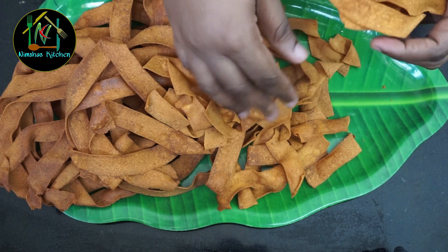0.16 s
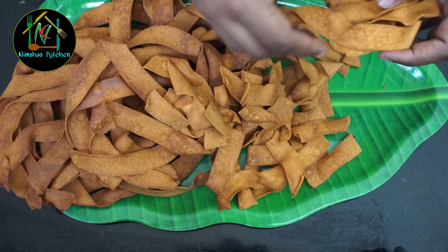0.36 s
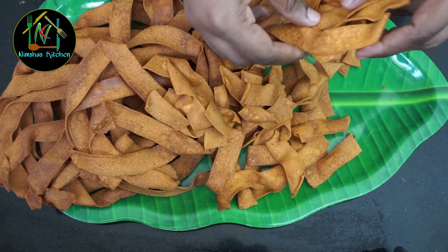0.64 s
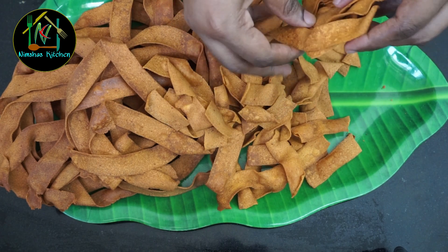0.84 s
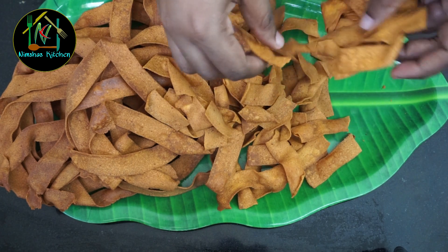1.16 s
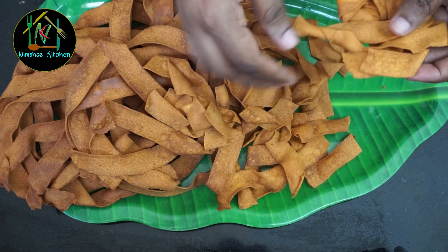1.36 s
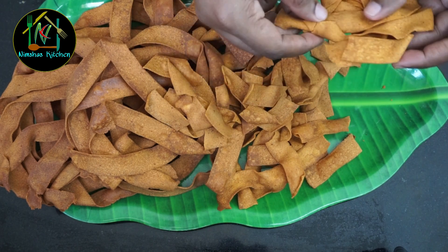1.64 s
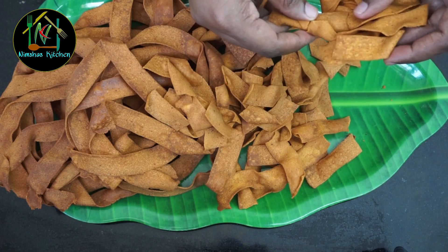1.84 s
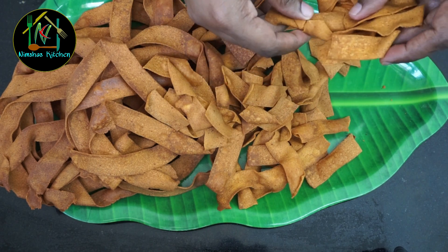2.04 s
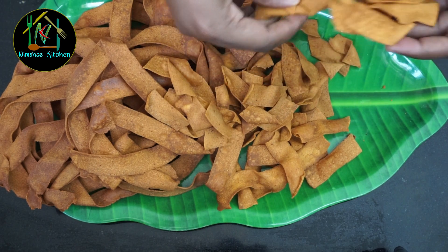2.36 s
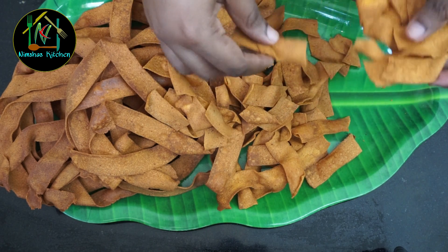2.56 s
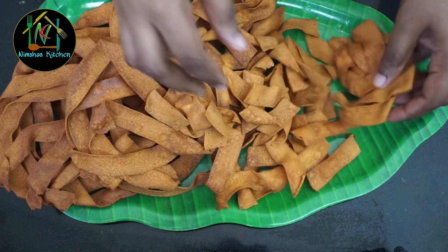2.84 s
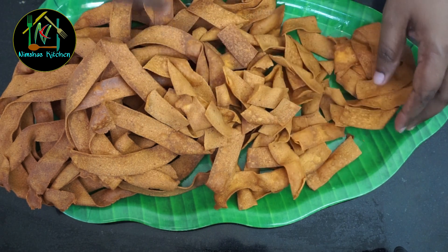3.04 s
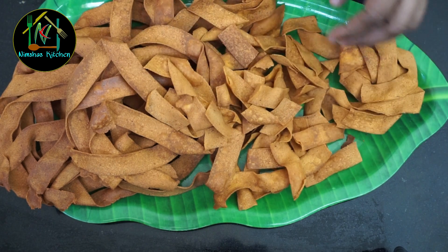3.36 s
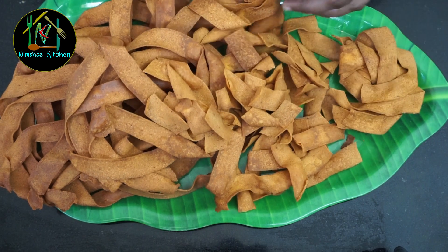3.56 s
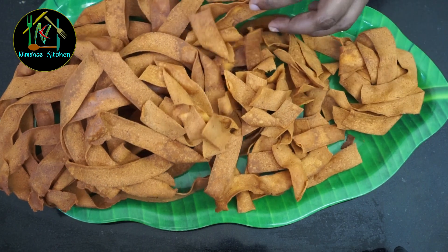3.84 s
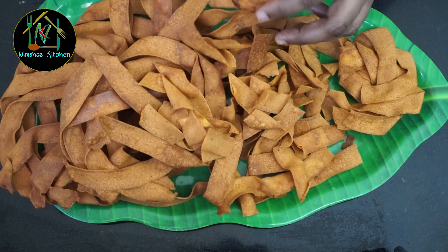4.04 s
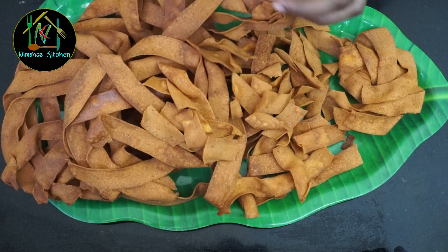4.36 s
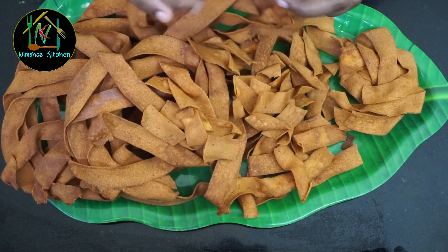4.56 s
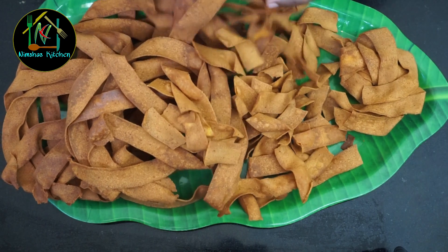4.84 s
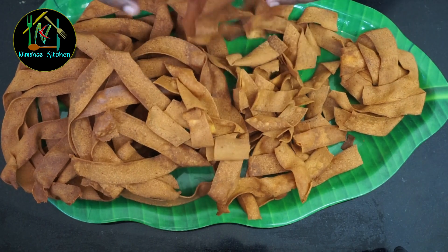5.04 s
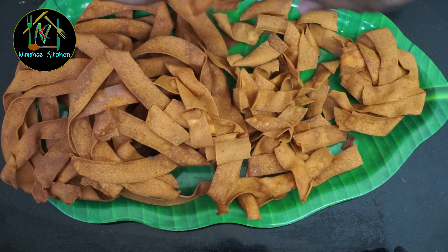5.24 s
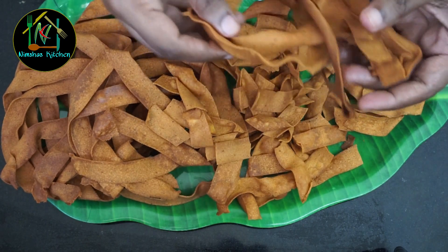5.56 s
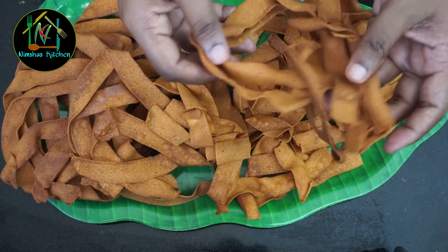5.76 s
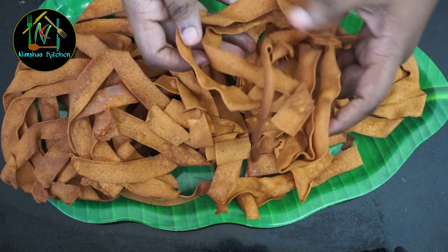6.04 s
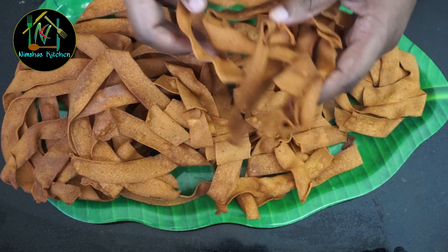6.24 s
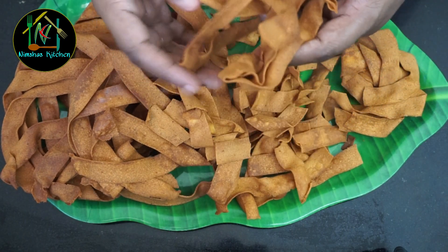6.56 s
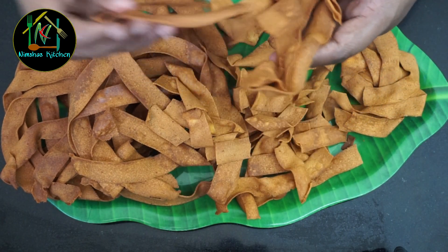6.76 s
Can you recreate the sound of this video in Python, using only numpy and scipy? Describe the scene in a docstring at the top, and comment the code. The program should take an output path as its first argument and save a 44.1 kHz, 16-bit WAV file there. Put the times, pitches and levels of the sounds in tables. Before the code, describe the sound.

Hands break crisp deep-fried strips with sharp, bright snaps over a plate, then rustle and scrape through the brittle heap in a kitchen.

```python
"""Over a faint drone that swells and fades, hands shuffle lightly and snap crisp fried strips over a plate.
Each snap is a run of tiny fractures that rings the fragment; dropped pieces ring their own modes and the plate's.
Then the hands dig into the heap, a swarm of scrapes and light knocks with crumbs clicking off the crust.
Last they lift it: the plate's ring fades from the swarm and a soft rumble swells.
A hard-walled kitchen answers with near echoes and a diffuse tail."""
import sys
import numpy as np
from scipy import signal
from scipy.fft import rfft, irfft, next_fast_len
from scipy.io import wavfile
from scipy.ndimage import uniform_filter1d

SR = 44100
rng = np.random.default_rng(int(sys.argv[2]) if len(sys.argv) > 2 else 0)


def transcribe(signal):
    """Save signal, clipped to [-1, 1], as a 16-bit WAV file at the path in sys.argv[1]."""
    frames = np.atleast_2d(signal).T
    limited = np.clip(frames, -1, 1)
    pcm = np.round(limited * 32767).astype(np.int16)
    wavfile.write(sys.argv[1], SR, pcm)


N = 304107

# All source levels are those before the room.
# Strips snapping and crunching. Each row: start in seconds, crack level in dB, fragment pitch in Hz,
# knock level in dB, crack decay in seconds.
STRIP_SNAPS = [(.221, -40, 6440, -42.5, 0.0025), (0.2375, -35, 5400, -57, 0.0035),
               (.6215, -55.5, 8000, -71, 0.0033), (0.8517, -48.5, 9000, -87, 0.0058),
               (0.977, -33.5, 9100, -61, 0.0015), (0.9793, -28.5, 9600, -46, 0.0016),
               (1.122, -44.5, 8160, -60, 0.002), (1.262, -46, 6300, -64, 0.001),
               (1.33, -36, 7300, -45, 0.0019), (1.49, -47, 5630, -43.5, 0.0028),
               (1.5398, -44.5, 6300, -36.5, 0.00093), (1.7564, -52, 6900, -57, 0.0021),
               (1.888, -27, 5870, -43.5, 0.0016), (2.1211, -36, 5560, -52.5, 0.0018),
               (2.13, -27.5, 7340, -46, 0.001), (2.2846, -45.5, 9400, -54.5, 0.0019),
               (2.3505, -31.5, 8700, -49, 0.0038), (2.7703, -35, 5050, -43, 0.0024),
               (2.889, -28.5, 5700, -33, 0.0016), (2.8962, -33, 6840, -34, 0.0042),
               (2.9, -25.5, 7500, -20.5, 0.0029), (3.069, -39.5, 3460, -36.5, 0.003),
               (3.6206, -43, 7500, -31, .004), (3.6631, -28.5, 8560, -32.5, 0.0076),
               (3.8752, -42, 7600, -47, 0.0091), (3.9082, -46, 5000, -52, 0.0028),
               (4.0607, -31, 6950, -37, 0.0093), (4.2206, -35, 6130, -37, 0.0057),
               (4.324, -40, 5770, -55, 0.0021), (4.5413, -42, 7040, -46, 0.0016),
               (4.6441, -41, 7940, -44, 0.0037), (4.723, -41, 7400, -41, .003),
               (4.8562, -40, 6950, -44, 0.0031), (4.873, -32.5, 8600, -47, 0.0067),
               (5.1094, -27.5, 8000, -29, 0.0055), (5.22, -36.5, 4270, -55, 0.0019),
               (5.1795, -29, 6430, -32.5, 0.0049), (5.301, -41.5, 6800, -61, 0.0077),
               (5.453, -34.5, 7300, -50, 0.0076), (5.5731, -24, 6400, -33, 0.006),
               (5.76, -39, 7000, -43, 0.0068), (5.7977, -34.5, 5500, -36.5, 0.006),
               (5.9957, -38.5, 4640, -51, 0.0028), (6.026, -35.5, 4650, -37, 0.0043),
               (6.0932, -29, 6160, -34.5, 0.0052), (6.1726, -35, 4400, -41, 0.0056),
               (6.647, -47, 8000, -54, 0.0045), (6.7368, -35.5, 7400, -52, 0.011),
               (6.784, -32.5, 6750, -56, 0.0085), (6.861, -40, 5700, -51, 0.0043)]
# Pieces landing on the heap. Each row: start in seconds, level in dB, pitch in Hz, settling time in seconds,
# plate ring against the piece in dB.
PIECE_DROPS = [(.245, -45.5, 1020, 0.013, -9), (1.336, -42.5, 1600, .028, -22),
               (1.54, -35, 1650, 0.0034, -15), (2.903, -32.5, 1740, .012, -1),
               (2.927, -22.5, 1860, .012, -12), (2.961, -25, 1860, .012, -12),
               (3.083, -31, 1720, .006, -8.5), (3.2058, -32, 1970, .007, -10.5),
               (3.319, -40, 2900, 0.0036, -14), (3.433, -43, 2100, 0.0056, -18),
               (3.975, -36.5, 1980, 0.0085, -6), (4.268, -35.5, 1600, .004, -2),
               (4.416, -34.5, 1620, 0.0087, 0), (4.535, -29.5, 1100, .006, -1),
               (4.775, -38, 1600, .003, -12), (5.026, -23.5, 956, .012, -8.5),
               (5.1368, -26, 4530, 0.000955, -18), (5.149, -27, 2140, .008, -26),
               (5.217, -37.5, 1600, .003, 4), (5.451, -34.5, 1550, 0.0031, -20),
               (5.812, -37.5, 2960, 0.0058, -13), (5.915, -39, 2620, .005, -20),
               (5.952, -35.5, 1840, .004, -11), (6.063, -35, 2550, .006, -23),
               (6.461, -51.5, 2770, .004, -25), (6.765, -32, 2340, 0.0019, -12),
               (6.812, -46, 2680, 0.0028, -18)]
# Hands pushing strips against each other. Each row: start in seconds, length in seconds, knocking in dB,
# scraping in dB, pitch of the gripped strip in Hz.
HAND_PUSHES = [(0, 0.031, -82, -55, 7000), (0.216, 0.042, -45.5, -46, 3360), (0.82, 0.027, -72, -63, 8000),
               (1.321, 0.088, -47.5, -52.5, 8300), (1.463, 0.052, -46, -55.5, 8440),
               (2.325, 0.052, -49, -38.5, 9000), (2.373, 0.026, -38, -29.5, 8200),
               (2.761, 0.12, -40.5, -47.5, 3260), (2.894, 0.069, -32, -34, 2920),
               (3.043, 0.034, -44, -46.5, 2800), (3.511, 0.092, -39, -47.5, 6100),
               (3.6, 0.088, -34, -33.5, 6300), (3.76, 0.11, -37, -56, 2100), (4.041, 0.032, -43, -37, 6840),
               (4.092, 0.11, -34.5, -40.5, 4030), (4.547, .11, -33, -39, 4070),
               (4.859, 0.12, -27.5, -32, 4230), (4.972, 0.12, -28, -32.5, 4000),
               (5.175, 0.057, -31.5, -40, 4080), (5.405, 0.14, -46, -38, 3700),
               (5.74, 0.065, -42.5, -40, 3280), (5.851, 0.16, -48, -44, 2840),
               (6.028, 0.049, -42, -35.5, 3220), (6.164, 0.04, -37, -35, 3860),
               (6.621, 0.16, -48, -43.5, 2570)]
# Light shuffling while the fingers rest in the strips. Each row: time in seconds, knocking in dB, scraping in dB.
FINGER_SHUFFLE = [(0, -92, -43.5), (.2, -72, -71.5), (.6, -68.5, -66.5), (1.25, -77, -70),
                  (1.6, -65.5, -68.5), (2.55, -63, -57.5), (2.75, -73, -73), (2.97, -41, -63),
                  (3.27, -49.5, -61), (3.5, -48.5, -52.5), (3.7, -37, -44.5), (4.48, -43.5, -52.5),
                  (4.85, -35, -42), (5.35, -48.5, -46.5), (5.67, -54, -57), (6.2, -49.5, -49),
                  (6.55, -62, -65), (6.85, -51, -51)]
# How strongly the heap rings the plate; it fades as the strips are lifted. Each row: time in seconds, gain in dB.
PLATE_CONTACT = [(5.2, -8), (5.5, -11), (6.4, -23)]
# Resonances of the loaded plate. Each row: pitch in Hz, width in Hz, mean gain in dB.
PLATE_MODES = [(316, 13, -5), (372, 18, -1.5), (560, 22, -2.5), (711, 86, 8.5), (964, 50, 9),
               (1100, 22, 10), (1165, 18, 4), (1265, 53, -4), (1470, 78, 7.5), (1620, 137, 6.5),
               (1970, 50, 8), (2270, 62, 3)]
# Colour of a fresh fracture. Each row: frequency in Hz, relative level in dB.
CRACK_SPECTRUM = [(300, -58), (1500, -25), (3000, -1.5), (5500, -0.5), (10500, 3), (16000, 1)]
# Colour of strips knocking. Each row: frequency in Hz, relative level in dB.
KNOCK_SPECTRUM = [(60, -59), (220, -20), (480, -5.5), (680, -0.5), (1000, -4), (1650, -2), (2300, 0),
                  (3200, -2.5), (5000, -2.5), (12000, -46)]
# Colour of strips scraping. Each row: frequency in Hz, relative level in dB.
SCRAPE_SPECTRUM = [(300, -77), (1200, -15), (2500, 6.5), (3800, 1.5), (6500, 0), (8700, 0), (9700, 0.5),
                   (11000, -1.5), (13000, -4), (16000, -13)]
# Soft rumble while the heap is lifted. Each row: time in seconds, level in dB.
RUMBLE_SWELL = [(4.6, -96), (5.6, -72), (6.2, -68), (6.6, -74)]
# Level of the faint drone. Each row: time in seconds, outer bands in dB, inner bands in dB.
DRONE_LEVELS = [(0, -91, -97), (.85, -64, -73), (1.2, -71, -77), (1.6, -74.5, -60), (1.9, -71.5, -71.5),
                (2.4, -69.5, -85), (3.3, -71.5, -61), (4, -71, -54.5), (5.5, -70, -61.5), (6.5, -67, -60),
                (6.9, -66.5, -66.5)]
# Colour of the room noise. Each row: frequency in Hz, relative level in dB.
ROOM_NOISE_SPECTRUM = [(25, -11), (45, -9), (90, 0), (150, -3), (220, -0.5), (340, -3), (600, -7),
                       (1200, -15.5), (2500, -15.5), (6000, -44), (16000, -28)]
# The kitchen's reverberation. Each row: frequency in Hz, time to fall 60 dB in seconds, relative tail level in dB.
KITCHEN_TAIL = [(146, 0.62, 12.5), (707, 0.62, -6), (1600, 0.41, -0.5), (3200, 0.54, -0.5),
                (9000, 0.33, -3), (16000, 0.3, -0.5)]
# The microphone pair. Each row: frequency in Hz, lead of the right in radians, left minus right in dB.
MICROPHONE_PORTS = [(60, 0.12, -0.5), (200, 0.65, 0.5), (490, 1, 0.8), (1470, 0.74, 1.9), (3000, 0.86, 1.3),
                    (8000, 0.66, 2.5), (15000, 0.18, 3)]

TOP_HZ = 16000  # upper limit of every resonance and of the final cut
CLEAN_BREAK_S = 0.0023  # a crack this short starts at full force; longer crunches build up
GRIP_DB, GRIP_WIDTH = 0.5, 0.17  # ring of the gripped strip: gain, and width as a share of its pitch
PUSH_RISE, PUSH_RELEASE_S = 0.27, 0.012  # rise as a share of the push; time constant of the strips settling
ROAM_DB, ROAM_RATE = 3, 14  # roaming of each plate mode: spread, changes a second
CRUMB_DB, CRUMB_HZ, CRUMB_WIDTH_HZ = -8, 4600, 5500  # crumbs: level against the scraping, centre, width


def snaps(width=1.1, ring_db=-17):
    """A crack runs through a strip in tiny steps; the fragment rings high and the whole strip knocks low."""
    out = np.zeros((2, N))
    for s, crack_db, hz, knock_db, decay_s in STRIP_SNAPS:
        steps = burst(decay_s, scatter_db=3.0, count=48, onset=min(CLEAN_BREAK_S / decay_s, 1))
        crack = resonate(colour(steps, CRACK_SPECTRUM), hz, width * hz)
        modes = ring(hz, octaves=1.0, cycles=12.0)
        fragment = signal.fftconvolve(steps, modes)[:len(steps)]
        mix = unit(crack) + undb(ring_db) * unit(fragment)
        snap = resonate(mix, hz, width * hz)  # it radiates best near its pitch
        knock = resonate(colour(steps, KNOCK_SPECTRUM), hz=1600, width_hz=1080)
        add(out, s, place(at_level(snap, crack_db) + at_level(knock, knock_db), spread_db=1.5))
    return out


def drops(tick_db=-10):
    """A loose piece lands, bounces and settles, ringing its own modes and the plate's."""
    out = np.zeros((2, N))
    for s, db, hz, settle_s, plate_db in PIECE_DROPS:
        bounces = burst(settle_s, scatter_db=-3.5, count=14)
        modes = ring(hz, octaves=0.88, cycles=28, count=9)
        piece = signal.fftconvolve(bounces, modes)[:len(bounces)]
        radiated = resonate_twice(piece, hz, 0.74 * hz)  # a light piece radiates no bass
        body = unit(radiated) + undb(plate_db) * unit(plate(bounces))
        tick = resonate_twice(bounces, hz=3140, width_hz=3700)
        landing = unit(body) + undb(tick_db) * unit(tick)
        add(out, s, place(at_level(landing, db), spread_db=2.0))
    return out


def hands():
    """Light shuffling and firm pushes set the strength of the swarm; in each push the gripped strip rings out."""
    knocks, scrapes = stirring()
    power = undb(follow(FINGER_SHUFFLE)) ** 2  # one row for knocking, one for scraping
    gripped = np.zeros((2, N))
    t = np.arange(N) / SR
    for s, length_s, knock_db, scrape_db, hz in HAND_PUSHES:
        rise = np.clip((t - s) / (PUSH_RISE * length_s), 0, 1)
        release = np.exp(-np.clip((t - s - length_s) / PUSH_RELEASE_S, 0, 20))
        push = rise * release
        power += (undb([[knock_db], [scrape_db]]) * push) ** 2
        gripped += undb(scrape_db + GRIP_DB) * push * resonate(scrapes, hz, GRIP_WIDTH * hz)
    knocking, scraping = np.sqrt(power)
    rough = scrapes + undb(CRUMB_DB) * crumbs()
    return knocks * knocking + rough * scraping + gripped


def stirring(count=3400, size=260, scatter_db=3.5, body_db=-1, edge_db=-3, rub_s=.0016):
    """Rough strips of many sizes bump and rasp past each other; most contacts are tiny, a few stand out."""
    strips = []
    for shortness in np.sort(rng.standard_normal(size)):
        rub = burst(rub_s * 2 ** rng.uniform(-1, 1), scatter_db=4.0, count=20)[:SR // 25]
        body = ring(1400 * 2 ** (0.68 * shortness), octaves=0.52, cycles=24.0)
        edge = ring(7500 * 2 ** (.5 * rng.standard_normal()), octaves=0.47, cycles=45)
        strip = []
        for modes, db in ((body, body_db), (edge, edge_db)):
            ringing = signal.fftconvolve(rub, modes)[:len(rub)]
            strip.append(unit(rub) + undb(db) * unit(ringing))
        strips.append(strip)
    # the fingers push a few alike strips at a time, so the colour keeps shifting
    handful = np.repeat(rng.random(count), 20)[:count] + .27 * rng.standard_normal(count)
    contacts = np.zeros((2, 2, N))  # bumps and rasps, each left and right
    for k in range(count):
        force_db = scatter_db * min(rng.exponential(), 3)
        gains = undb(force_db + 2 * rng.standard_normal((2, 1))) * rng.choice([-1, 1])
        contact = gains * strips[int(handful[k] * size) % size]
        s = (k + 2 * rng.random()) / count * N / SR
        add(contacts, s, place(contact[:, None], spread_db=5.5))
    bumps = np.array([colour(c, KNOCK_SPECTRUM) for c in contacts[0]])
    rasps = np.array([colour(c, SCRAPE_SPECTRUM) for c in contacts[1]])
    knocks = steady(bumps + undb(follow(PLATE_CONTACT)) * plate(bumps))
    return knocks, steady(rasps)


def crumbs(count=1300, scatter_db=4.0):
    """Blisters of crust give way one by one, each a single dry click."""
    clicks = np.zeros((2, N))
    when, force, side, sign = rng.random((count, 4)).T
    sizes = undb(scatter_db * np.minimum(-np.log(1 - force), 3)) * np.sign(sign - .5)
    clicks[:, (when * N).astype(int)] = sizes * np.sqrt([.5 + side, 1.5 - side])
    return steady(resonate_twice(clicks, CRUMB_HZ, CRUMB_WIDTH_HZ), window_s=0.06)


def plate(x):
    """The plate's ring; each mode swells and fades as the point of contact moves."""
    ringing = 0
    for hz, width_hz, db in PLATE_MODES:
        gain = undb(db + ROAM_DB * wander(x.shape[-1]))
        ringing = ringing + gain * resonate(x, hz, width_hz)
    return ringing


def rumble():
    """A soft, deep swell of narrow-band noise."""
    db, = follow(RUMBLE_SWELL)
    return undb(db) * narrow_band(hz=62, width_hz=70)


def background(floor_db=-65, side_db=-12):
    """Soft coloured room noise, slightly wide, and a low drone of wavering noise bands."""
    mid, side = (colour(rng.standard_normal(N), ROOM_NOISE_SPECTRUM) for _ in range(2))
    noise = mid + undb(side_db) * side * np.array([[1], [-1]])
    outer_db, inner_db = follow(DRONE_LEVELS)
    outer = narrow_band(150.5, 25.0) + undb(-5.5) * narrow_band(468.6, 24)
    inner = (narrow_band(314.0, 43) + narrow_band(383.7, 37)) / np.sqrt(2)
    return undb(floor_db) * noise + undb(outer_db) * outer + undb(inner_db) * inner


def kitchen(dry, tail_db, early_db, table_db, early_s=0.0072, gap_s=0.0025, table_s=.0077,
            alike_hz=2800, sparse_s=.03):
    """A bounce off the worktop, a patter of near reflections, then a tail that loses its treble first."""
    t = seconds(.8)
    hz = np.fft.rfftfreq(len(t), 1 / SR)
    density = np.clip((t / sparse_s) ** 2, .03, 1)  # echoes come singly at first, then crowd together
    present = rng.random(len(t)) < density
    mid, side = rfft(rng.standard_normal((2, len(t))) * present / np.sqrt(density))
    apart = hz / np.hypot(hz, alike_hz)  # long waves reach both ports alike
    diffuse = (mid + apart * side * np.array([[1], [-1]])) / np.sqrt(1 + apart ** 2)
    near = undb(early_db) * unit(np.exp(-t / early_s))
    response = 0
    for k, (_, t60, db) in enumerate(KITCHEN_TAIL):
        # overlapping bands, each full at its own row and gone at its neighbours
        share, = over_hz([(row[0], j == k) for j, row in enumerate(KITCHEN_TAIL)], hz)
        fade = undb(tail_db + db) * unit(np.exp(-np.log(1000) * t / t60) * (t > gap_s))
        response = response + irfft(diffuse * share, len(t)) * np.hypot(fade, near)
    response[:, int(table_s * SR)] += undb(table_db)
    return undb(-3.5) * dry + signal.fftconvolve(dry, response, axes=1)[:, :N]


def burst(decay_s, scatter_db, count, onset=0.48):
    """A run of uneven impulses that builds quickly and dies away, evened out in colour."""
    t = seconds(.16)
    pulses = np.zeros(len(t))
    age = np.linspace(0, 4, count) + np.r_[0, rng.uniform(-2, 2, count - 1) / count]  # in decay times
    swell = np.minimum(onset + 2 * age, 1) * np.exp(-age)
    scatter = undb(scatter_db * np.r_[0, rng.standard_normal(count - 1)])
    size = swell * scatter * rng.choice([-1, 1], count)
    np.add.at(pulses, np.clip(age * decay_s * SR, 0, len(t) - 1).astype(int), size)
    spectrum = rfft(pulses)
    flatter = spectrum / np.sqrt(np.abs(spectrum) + 1e-9)  # halves the spectrum's peaks and dips in dB
    return irfft(flatter, len(t)) * (t < 5 * decay_s)


def ring(hz, octaves, cycles, count=6):
    """A strip's bending modes, scattered round a pitch; each falls 60 dB in so many cycles."""
    t = seconds(.04)
    offset = np.linspace(-1, 1, count) + rng.uniform(-0.5, 1, count) / count
    f = np.minimum(hz * 2 ** (octaves * offset), TOP_HZ)[:, None]
    size = np.hanning(count + 2)[1:-1, None] * rng.choice([-1, 1], (count, 1))
    decay = np.exp(-np.log(1000) * f * t / cycles)
    return unit(np.sum(size * np.sin(2 * np.pi * f * t) * decay, axis=0))


def steady(x, window_s=0.046):
    """The hand's effort, not chance, sets the level of the swarm: divide out its short-term rms."""
    return x / np.sqrt(uniform_filter1d(np.mean(x ** 2, axis=0), int(window_s * SR)) + 1e-9)


def wander(length):
    """A slow random drift through points with a spread of 1."""
    points = rng.standard_normal(256)
    return np.interp(np.arange(length) / SR * ROAM_RATE, np.arange(len(points)), points)


def narrow_band(hz, width_hz):
    """A narrow, wavering band of noise with rms 1."""
    band = resonate_twice(rng.standard_normal(N), hz, width_hz)
    return band / band.std()


def colour(x, spectrum, size=1024):
    """Causal filter with the shape of the given spectrum and unit energy, built from its cepstrum."""
    db, = over_hz(spectrum, np.fft.rfftfreq(size, 1 / SR))
    cepstrum = irfft(np.log(undb(db)))
    cepstrum[1:size // 2] *= 2  # folding the cepstrum puts the energy first
    cepstrum[size // 2 + 1:] = 0
    return signal.fftconvolve(x, unit(irfft(np.exp(rfft(cepstrum)))))[:len(x)]


def resonate(x, hz, width_hz):
    """Band-pass with gain 1 at the centre."""
    centre = min(hz, TOP_HZ)
    b, a = signal.iirpeak(centre, centre / min(width_hz, TOP_HZ), SR)
    return signal.lfilter(b, a, x)


def resonate_twice(x, hz, width_hz):
    """The same band-pass two times over, for steeper skirts."""
    return resonate(resonate(x, hz, width_hz), hz, width_hz)


def undb(db):
    """Decibels to gain."""
    return 10 ** (np.asarray(db) / 20)


def unit(x):
    """Scale to unit energy."""
    return x / np.sqrt(np.sum(x ** 2) + 1e-18)


def at_level(x, db):
    """Give a short sound the energy of 10 ms at this level."""
    return undb(db) * unit(x) * np.sqrt(SR / 100)


def seconds(length):
    """The time of each sample."""
    return np.arange(int(length * SR)) / SR


def follow(table):
    """The columns of a curve at every sample."""
    s, *columns = np.transpose(table)
    return [np.interp(np.arange(N) / SR, s, c) for c in columns]


def over_hz(table, hz):
    """The columns of a spectrum at the given frequencies, joined along log frequency."""
    points, *columns = np.transpose(table)
    return [np.interp(np.log(hz + 1), np.log(points), c) for c in columns]


def place(sound, spread_db):
    """Each sound lies a little to the left or right."""
    return sound * undb(spread_db * rng.standard_normal() * np.array([[.5], [-.5]]))


def add(track, s, sound):
    """Mix a sound into a track at a time."""
    i = int(np.clip(s * SR, 0, N - 1))
    track[..., i:i + sound.shape[-1]] += sound[..., :N - i]


def scene():
    """Single snaps and drops get strong near echoes; the spread-out heap gets weaker ones."""
    single = kitchen(snaps() + drops(), tail_db=-1.5, early_db=-3.0, table_db=-15.5)
    heap = kitchen(hands(), tail_db=-3.5, early_db=-10.5, table_db=-35)
    return single + heap + rumble() + background()


def record(dry):
    """The right port leads in phase, the left one is louder except in the deep bass; the top is cut."""
    size = next_fast_len(N + SR // 10)
    lead, tilt_db = over_hz(MICROPHONE_PORTS, np.fft.rfftfreq(size, 1 / SR))
    sides = np.array([[.5], [-.5]])  # each port takes half the difference
    ports = undb(sides * tilt_db) * np.exp(-1j * sides * lead)
    heard = irfft(rfft(dry, size) * ports, size)[:, :N]
    return signal.sosfilt(signal.ellip(8, .2, 70, TOP_HZ, fs=SR, output="sos"), heard)


dry = scene()
out = record(dry)
transcribe(out)
```